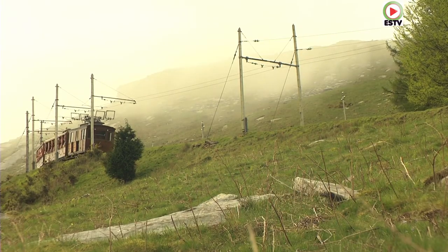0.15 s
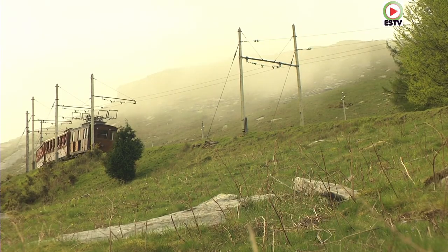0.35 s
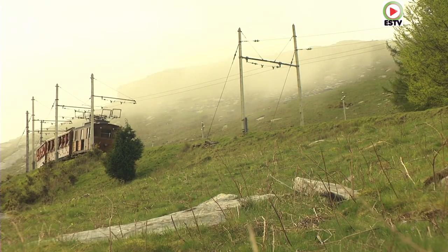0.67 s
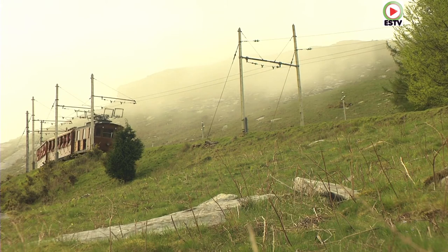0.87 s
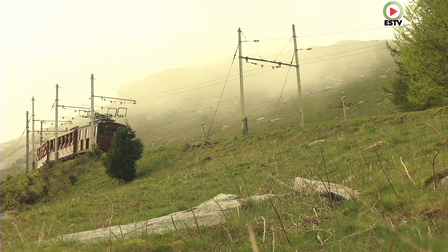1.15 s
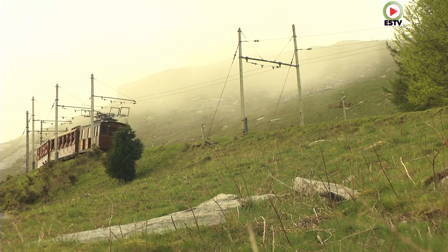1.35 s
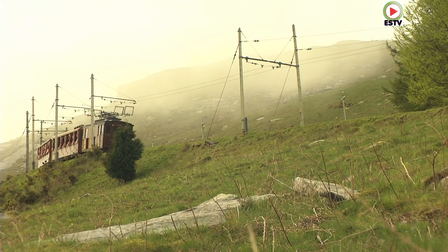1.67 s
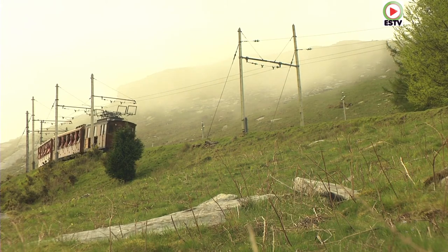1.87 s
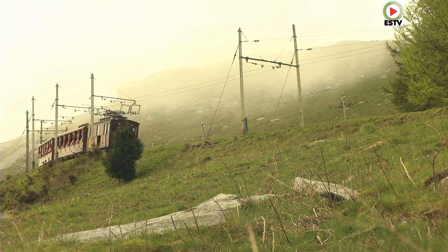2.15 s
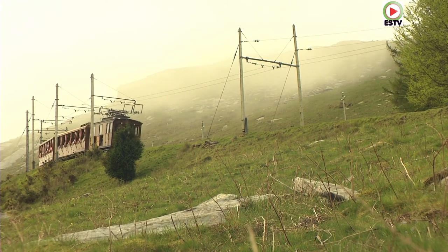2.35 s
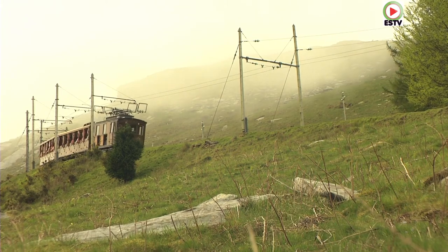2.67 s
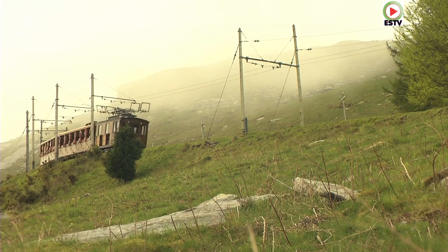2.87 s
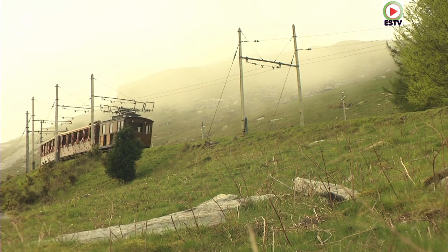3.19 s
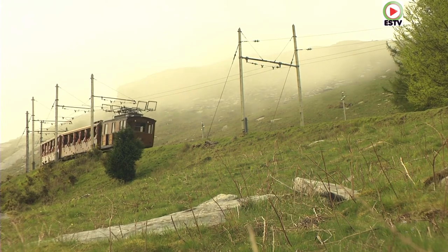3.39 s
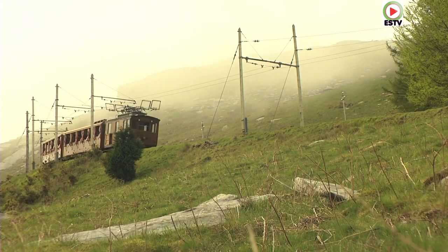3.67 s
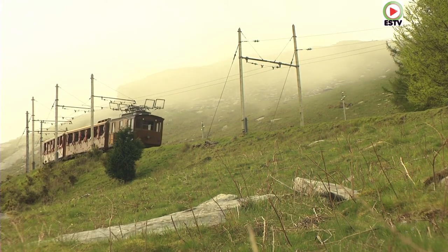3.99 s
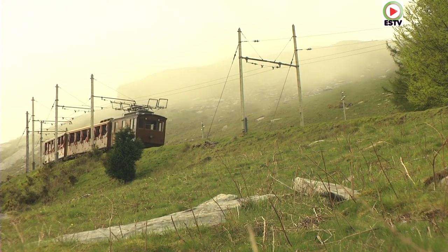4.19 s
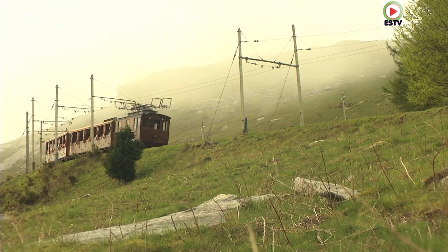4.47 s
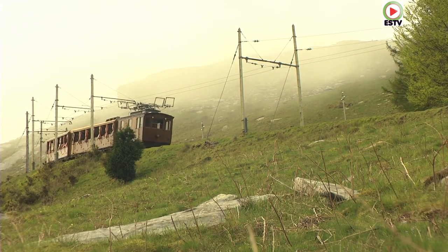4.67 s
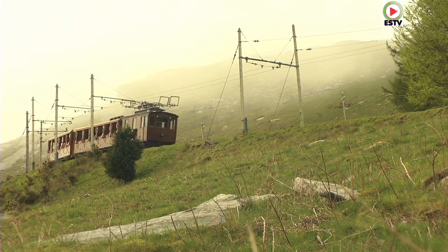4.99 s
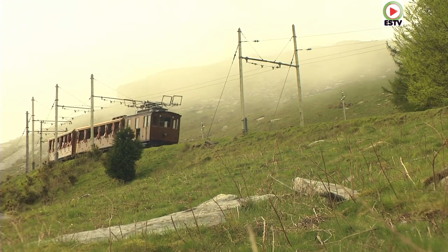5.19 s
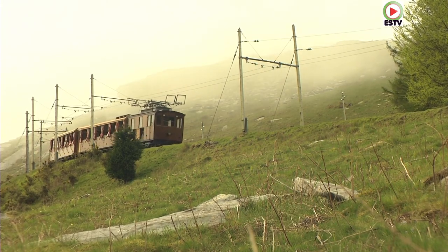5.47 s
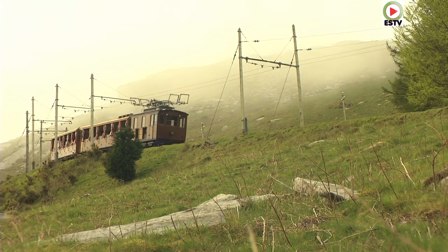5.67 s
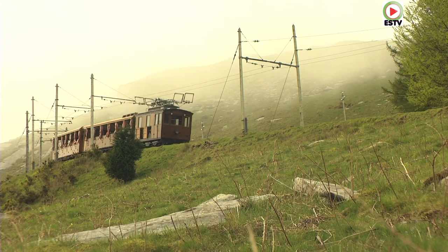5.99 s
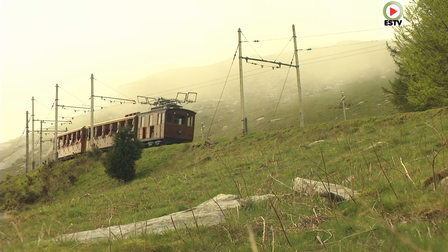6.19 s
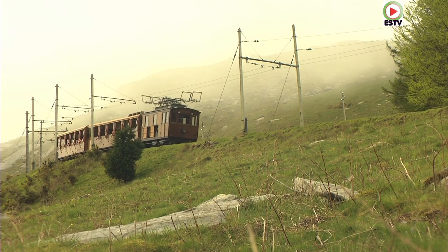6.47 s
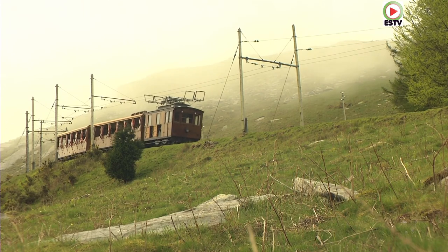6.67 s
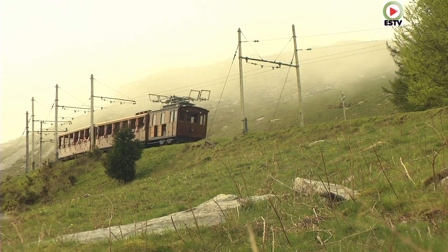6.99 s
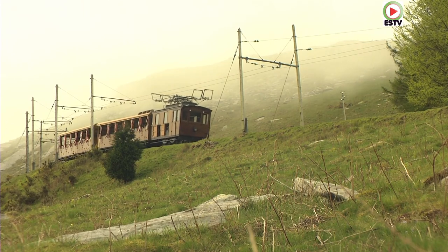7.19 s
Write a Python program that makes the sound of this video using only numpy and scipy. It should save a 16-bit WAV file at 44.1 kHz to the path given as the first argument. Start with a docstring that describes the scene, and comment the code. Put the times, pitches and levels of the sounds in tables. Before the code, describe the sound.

From 0 s an electric rack train is already climbing at a steady crawl, heard from a fixed spot on an open slope. About thirteen times a second a gear tooth makes the wheel ring with a rough mid-pitched note, scrapes the steel rack and leaves with a thin high squeak, over a fine hiss. The chatter swells slightly about twice a second and stays even in pace. Beneath it, gears and motors hold low humming tones and a mid-low drone, while carriages roll with deep rumble, surging around 2.2, 4-4.8, 5.3 and 7.2 s, and soft low booms. The ringing dips around 2-3 s, then returns unevenly. Between 3.1 and 4.1 s a small bird gives faint, partly hoarse whistles. Sparse faint dry ticks follow from 4.3 to 6.3 s. The drone and rolling gradually grow as the train nears; from about 7 s scrape and hiss thicken until the end at 7.3 s.

```python
"""From the start, an electric rack train climbs a grassy slope at a steady crawl, some way off.
Its pinion takes 12.7 rack teeth a second: each sets the wheel ringing, scrapes, and leaves with a squeak.
Gears and motors hum as steady tones; the carriages rumble and boom as shaped noise and one low note.
From about 3 s a small bird whistles faintly, then faint dry ticks of noise follow.
Close to the end the scrape and hiss thicken."""
import sys
import numpy as np
from scipy import signal
from scipy.fft import rfft, irfft, next_fast_len
from scipy.io import wavfile
from scipy.ndimage import map_coordinates

SR = 44100
rng = np.random.default_rng(int(sys.argv[2]) if len(sys.argv) > 2 else 0)


def unload_audio(sound):
    """Save the sound as a 16-bit wav file, at the path given as the first command line argument."""
    columns = np.transpose(np.atleast_2d(sound))
    # keep every value between -1 and 1, then stretch to whole-number steps
    steps = np.round(np.clip(columns, -1, 1) * 32767)
    wavfile.write(sys.argv[1], SR, steps.astype(np.int16))


N = 323694

GEAR_HZ = 54.83  # rate at which the reduction gears' teeth mesh


def pinion():
    """The pinion rolls through the rack, and the force on each tooth drives all the steel around it."""
    start_rate, slowing = 12.676, .0013  # rack teeth per second, and the loss per second on the climb
    beat_hz, crest_s = 2.275, .095  # slow regular swell, and the time of one crest
    thicken_s, rise_s = 6.95, .14  # when scrape and hiss thicken, and how long that takes
    t = np.arange(N) / SR
    teeth = np.cumsum(start_rate - slowing * t) / SR  # teeth passed so far
    beat = np.cos(2 * np.pi * beat_hz * (t - crest_s))
    thick = np.clip((t - thicken_s) / rise_s, 0, 1)
    ring, scrape, squeak = tooth_forces(teeth)
    squeak = squeak * amp(.45 * wobble(14))  # some teeth squeak more than others
    grit = amp(1.5 * wobble(300))  # the steel faces catch and slip many times in one contact
    ringing = running_gear(teeth, ring, scrape) + wheel(teeth, ring, beat)
    scraping = rack_bar(teeth, scrape, grit, thick)
    hiss = steel_hiss(scrape, squeak, grit, beat, thick)
    return ringing + scraping + flank(teeth, squeak) + hiss


def tooth_forces(teeth):
    """Force on wheel, rack and flank; no two teeth bear quite alike."""
    # the passage of one tooth: (share of the cycle [0-1], ring [dB], scrape [dB], squeak [dB])
    passage = [(.05, 0, 0, -5), (.17, -2.8, -2.5, -1), (.25, -8, -4.5, 0), (.37, -10, -4.8, -1.5),
               (.47, -13, -7, -5.5), (.62, -5, -9, -11), (.73, -4.5, -6.5, -7.5), (.88, -1.3, -3.5, -4.5)]
    share, *columns = np.transpose(passage)
    uneven_db = .8 * wobble(13)
    timing = teeth + .015 * wobble(9)
    return [amp(np.interp(timing, share, db, period=1) + uneven_db) for db in columns]


def wheel(teeth, ring, beat):
    """The wheel sings while a tooth bears on it; the gear mesh ripples the sound."""
    # resonances of the wheel: (centre [Hz], width [Hz], relative level [dB])
    wheel_modes = [(795, 31, -2), (865.7, 62, 0), (971, 94, -17)]
    # level of the ring before its slow beat: (time [s], level [dB])
    ring_level = [(0, -46), (.9, -46.5), (1.6, -50), (2.9, -50.5), (3.5, -49), (4.45, -46), (5.1, -49.5),
                  (5.8, -45), (6.8, -48), (7.34, -46.5)]
    beat_db = 1.03
    ripple = 1 + .17 * np.sin(2 * np.pi * GEAR_HZ * np.arange(N) / SR)
    note = sung(teeth, hz=816, spread_hz=4, slip=.68, entry=.4, band_hz=110, force=ring)
    rough_note = blend(note, rubbed(wheel_modes, ring), rough=.34)
    song = held(rough_note, ring, grip=.45, hz=840, band_hz=140)
    return amp(curve(ring_level) + beat_db * beat) * ripple * song


def running_gear(teeth, ring, scrape):
    """The heavy axle and frame answer every tooth alike, and grow louder as the train nears."""
    # resonances of the axle: (centre [Hz], width [Hz], relative level [dB])
    axle_modes = [(271.6, 39, 0)]
    # resonances of the frame: (centre [Hz], width [Hz], relative level [dB])
    frame_modes = [(491, 43, -2), (551, 34, -0.6), (598, 32, -3.5)]
    # tones that every tooth drives alike: (multiple of the tooth rate, relative level [dB])
    frame_tones = [(37, -6), (38, -1), (39, -3.5), (40, 6.5), (41, -14), (42, -4.5), (43, -11.5), (44, -12)]
    axle = sung(teeth, hz=270.3, spread_hz=.5, slip=.15, entry=.47, band_hz=27, force=1)
    drone = blend(axle, rubbed(axle_modes, ring), rough=.08)
    steady_tones = tones(teeth, frame_tones, crest=.2, waver_db=1.2, drift=.28)
    frame = blend(steady_tones, rubbed(frame_modes, ring + scrape + .15), rough=.42)
    near_drone = nearing(start_db=-52.5, db_per_s=0.46) * drone
    return near_drone + nearing(start_db=-56, db_per_s=0.6647) * frame


def rack_bar(teeth, scrape, grit, thick):
    """Each tooth scrapes the rack bar; at the height of the load a hard one makes it ping."""
    # resonances of the rack: (centre [Hz], width [Hz], relative level [dB])
    rack_modes = [(996, 90, -4.5), (1094, 70, -8.5), (1200, 88, -8), (1286, 60, -1), (1358, 100, -4),
                  (1509, 120, -3.5), (1649, 200, -2.5), (1936, 150, -7), (2146, 110, -6.5), (2336, 260, -9)]
    # the echo off the slope cancels a band; below zero it adds: (time [s], depth [share of the sound])
    echo_depth = [(0, -.2), (2, 0), (4, 0.27), (5.2, 0.3), (6.5, 0.8), (7.34, 0.4)]
    # level of the scrape before the echo: (time [s], level [dB])
    scrape_level = [(0, -52.5), (.9, -52), (1.3, -55.5), (4.15, -55), (5.5, -60), (6.85, -61),
                    (7.15, -58.7)]
    # rubbing between the teeth, as a share of the peak force: always, and added by the thickening
    steady_rub, thicken_rub = 0.036, .35
    ping_force = scrape ** 4 * amp(2.5 * wobble(12))
    ping = sung(teeth, hz=1292, spread_hz=9, slip=3, entry=.52, band_hz=70, force=ping_force)
    steady = np.clip(steady_rub + thicken_rub * thick, 0, 1)
    rub_force = (scrape + steady * (1 - scrape)) * grit
    rack = blend(ping, rubbed(rack_modes, rub_force), rough=.9)
    echo_band = filtered(rack, lambda hz: np.exp(-((hz - 2020) / 330) ** 2))
    return amp(curve(scrape_level)) * (rack - curve(echo_depth) * echo_band)


def flank(teeth, squeak):
    """The flank of the tooth squeaks as it slides out."""
    # resonances of the flank: (centre [Hz], width [Hz], relative level [dB])
    flank_modes = [(2685, 200, 0.0008), (2814, 240, 0)]
    # level of the squeak: (time [s], level [dB])
    squeak_level = [(.6, -65.5), (1.05, -60), (1.75, -67), (2.35, -59.5), (3.6, -62.5), (4.35, -59.5),
                    (5.3, -63.5), (5.8, -60), (6.6, -62.5), (7.34, -69)]
    whistle = sung(teeth, hz=2768, spread_hz=65, slip=2.93, entry=.64, band_hz=180, force=squeak ** 2)
    return amp(curve(squeak_level)) * blend(whistle, rubbed(flank_modes, squeak), rough=.66)


def steel_hiss(scrape, squeak, grit, beat, thick):
    """The sliding steel faces hiss with every tooth."""
    # colour of the hiss: (frequency [Hz], relative level [dB])
    hiss_colour = [(500, -20), (1200, -3.5), (2500, 6.5), (3300, 2), (4200, 1.5), (4700, -5), (5300, -8.5),
                   (6200, -13.5), (7000, -20), (8200, -27), (10000, -41), (15000, -72)]
    # level of the hiss before beat and thickening: (time [s], level [dB])
    hiss_level = [(.5, -67.5), (1.25, -69.5), (2.35, -65), (2.9, -66.5), (3.6, -64.7), (5.15, -65.5),
                  (5.85, -63), (6.7, -65), (7.34, -64.5)]
    beat_db, thicken_db = 0.7, 3
    gain = amp(curve(hiss_level) + beat_db * beat + thicken_db * thick)
    rubbing = .31 + scrape + .35 * squeak
    return gain * unit(rush(hiss_colour) * grit * rubbing)


def carriages():
    """Wheels roll on the rails, the rumble surges and the car bodies boom at one low note."""
    # colour of the rumble: (frequency [Hz], relative level [dB])
    rumble_colour = [(8, -37), (15, -12.5), (21, 0), (32, 17.5), (45, 13.5), (62, 7.5), (90, -1),
                     (140, -47), (400, -120)]
    # colour of the rolling wheels: (frequency [Hz], relative level [dB])
    rolling_colour = [(50, -36.5), (90, 0.5), (115, -2), (135, -5), (180, -8), (205, -17), (240, -24),
                      (330, -22), (420, -23), (680, -26.5), (1200, -24.5), (3000, -78), (6000, -120)]
    # level of the rolling wheels: (time [s], level [dB])
    rolling_level = [(0, -51.5), (1.4, -49), (2.45, -47.8), (3.2, -49), (4.3, -47.6), (5.3, -47.5),
                     (6.05, -45.2), (6.7, -46.5), (7.34, -44.5)]
    # surges of the rumble: (start [s], length [s], added level [dB])
    surges = [(2.2, 0.33, -40), (4.1, .45, -41.5), (4.62, 0.15, -37.5), (5.33, 0.23, -45),
              (7.22, .2, -40.5)]
    # booms of the car bodies: (start [s], length [s], added level [dB])
    booms = [(1.26, .4, -39.5), (2.9, 0.59, -42), (4.13, 0.92, -45.5), (5.33, .72, -41), (6.28, 0.3, -44)]
    low_note = np.sqrt(2) * np.sin(2 * np.pi * 75.4 * np.arange(N) / SR + 1.3 * wobble(5))
    boom = blend(low_note, rubbed([(76, 26, 0)], 1), rough=.6)
    unrest = amp(2 * wobble(6))
    rumble = swells(surges, rest_db=-45, edge_s=.12) * unrest * rush(rumble_colour)
    rolling = amp(curve(rolling_level)) * rush(rolling_colour)
    return rumble + swells(booms, rest_db=-51.5, edge_s=0.23) * boom + rolling


def motors():
    """Gear mesh and magnetised iron hum steadily, wavering on the way through the air."""
    # hum of the gears before wavering: (multiple of the gear mesh rate, rms level [dB])
    gear_tones = [(1, -48.5), (2, -53.5), (3, -68), (4, -71.5)]
    # hum of the motors' iron before wavering: (frequency [Hz], rms level [dB])
    iron_tones = [(50, -56), (100, -61.5)]
    t = np.arange(N) / SR
    hum = np.zeros(N)
    for hz, db in [(round(k) * GEAR_HZ, db) for k, db in gear_tones] + iron_tones:
        level = np.sqrt(2) * amp(db + 1.6 * wobble(2.5))
        phase = 2 * np.pi * (hz * t + rng.random()) + 0.3 * wobble(2.5)
        hum += level * np.sin(phase)
    return hum


def bird():
    """Thin, mostly falling whistles; a randomly shaken phase makes some of them hoarse."""
    # notes: (start [s], length [s], start [Hz], middle [Hz], end [Hz], peak level [dB], blur [0-1])
    notes = [(3.11, .12, 8650, 8350, 8280, -90, .35), (3.28, .1, 8350, 8360, 7900, -86, .25),
             (3.44, .11, 5100, 4950, 4800, -67, .8), (3.68, .16, 6000, 5900, 5850, -80, .9),
             (3.72, .1, 6750, 6650, 6550, -84, .9), (4.04, .08, 5550, 5500, 5450, -75, .6)]
    song = np.zeros(N + SR)
    for s, length, start_hz, middle_hz, end_hz, db, blur in notes:
        u = np.linspace(0, 1, int(length * SR))  # progress through the note
        hz = np.interp(u, [0, .5, 1], [start_hz, middle_hz, end_hz])
        phase = 2 * np.pi * np.cumsum(hz) / SR + 2 * blur * wobble(300)[:len(u)]
        song[round(s * SR):][:len(u)] += amp(db) * np.sin(np.pi * u) * np.sin(phase)
    return song[:N]


def ticks():
    """Short bright ticks: bursts of noise that fall by 60 dB in 30 ms."""
    # faint dry ticks, 2.5 dB are taken off each: (time [s], level [dB])
    tick_times = [(4.3146, -71), (4.7237, -74), (5.0794, -73), (5.3617, -76), (6.2557, -68)]
    force, t = np.zeros(N + SR), np.arange(SR // 10) / SR
    for s, db in tick_times:
        force[round(s * SR):][:len(t)] += amp(db - 2.5 - 60 * t / .03)
    return force[:N] * rush([(2000, -23), (4500, -1), (7500, -4), (9500, -18), (15000, -29)])


def sung(teeth, hz, spread_hz, slip, entry, band_hz, force):
    """Each tooth starts a fresh ring at the share entry of its cycle, a little off in pitch and phase; rms 1."""
    cycle = teeth - entry + 1
    detune, offset = rng.standard_normal((200, 2))[cycle.astype(int)].T
    age = (cycle % 1 - .5) / np.gradient(teeth) / SR  # seconds from the middle of the ring
    ring = force * np.sin(2 * np.pi * (hz + spread_hz * detune) * age + slip * offset)
    return unit(filtered(ring, lambda f: 1 / (1 + ((f - hz) / band_hz) ** 4)))


def held(x, force, grip, hz, band_hz):
    """Stick-slip holds the swing of a ringing part near the force that drives it; rms 1."""
    swing = np.abs(signal.hilbert(x, next_fast_len(N))[:N])
    steady = x * (force / (swing + .1)) ** grip
    return unit(filtered(steady, lambda f: 1 / (1 + ((f - hz) / band_hz) ** 4)))


def rubbed(modes, force):
    """Friction noise under a changing force, heard through steep resonances; rms 1."""
    def response(hz):
        peaks = [amp(db) / (1 + (2 * (hz - centre) / width) ** 2) for centre, width, db in modes]
        return np.sqrt(sum(peak ** 2 for peak in peaks))
    return unit(filtered(force * rng.standard_normal(N), response))


def tones(teeth, orders, crest, waver_db, drift):
    """Wavering multiples of the tooth rate that line up at the share crest of each cycle; rms 1."""
    start = rng.uniform(0, 2 * np.pi)
    total = np.zeros(N)
    for k, db in orders:
        phase = 2 * np.pi * round(k) * (teeth - crest) + start + drift * wobble(3)
        total += amp(db + waver_db * wobble(3.027)) * np.sin(phase)
    return unit(total)


def blend(clean, noisy, rough):
    """Mix with the share rough of the power in the noisy part."""
    rough = np.clip(rough, 0, 1)
    return np.sqrt(1 - rough) * clean + np.sqrt(rough) * noisy


def rush(points):
    """Noise of rms 1 with a spectrum of (frequency [Hz], relative level [dB]) points."""
    f, db = np.transpose(points)
    response = lambda hz: amp(np.interp(np.log(hz + 1), np.log(f), db))
    return unit(filtered(rng.standard_normal(N), response))


def swells(rows, rest_db, edge_s):
    """Gain that rests at one level and rises, holds and falls for each (start, length, added dB) row."""
    t = np.arange(N) / SR
    power = amp(rest_db) ** 2
    for s, length, db in rows:
        gate = np.clip(.5 + np.minimum(t - s, s + length - t) / edge_s, 0, 1)
        power = power + (amp(db) * gate) ** 2
    return np.sqrt(power)


def nearing(start_db, db_per_s):
    """Gain of a part that grows louder as the train comes closer."""
    return amp(start_db + db_per_s * np.arange(N) / SR)


def curve(points):
    """One value per sample from (time [s], value) points."""
    return np.interp(np.arange(N) / SR, *np.transpose(points))


def wobble(rate):
    """A smooth random curve with this many random knots a second."""
    knots = rng.standard_normal(4096)
    return map_coordinates(knots, [np.arange(N) * rate / SR], mode="wrap")


def filtered(x, response):
    """Weigh each frequency of x by a response."""
    size = next_fast_len(N + 8192)
    return irfft(rfft(x, size) * response(np.fft.rfftfreq(size, 1 / SR)), size)[:N]


def amp(db):
    """Turn decibels into a plain factor."""
    return 10 ** (np.asarray(db) / 20)


def unit(x):
    """Scale x to an rms (average strength) of 1."""
    return x / np.sqrt(np.mean(x ** 2) + 1e-20)


def scene():
    """The train, the bird and the ticks, heard from one spot on the slope."""
    return (pinion() + carriages() + motors() + bird() + ticks())[None]


def record(dry):
    """The recorder adds a faint even hiss, fades the scene's ends and keeps nothing above its band limit."""
    top_hz = 15720
    fade = signal.windows.tukey(N, .001)
    hiss = amp(-85.5) * rng.standard_normal(N)
    return filtered(fade * dry[0] + hiss, lambda hz: hz < top_hz)[None]


dry = scene()
out = record(dry)
unload_audio(out)
```